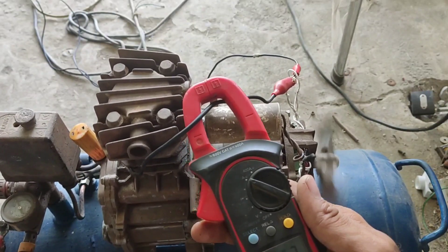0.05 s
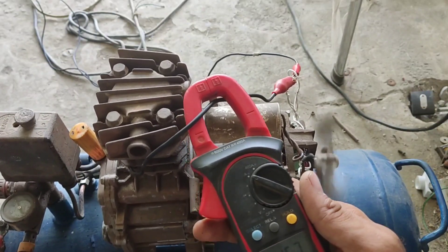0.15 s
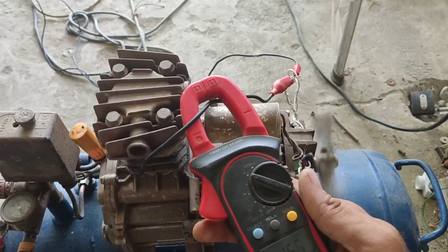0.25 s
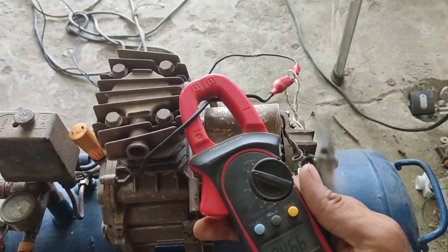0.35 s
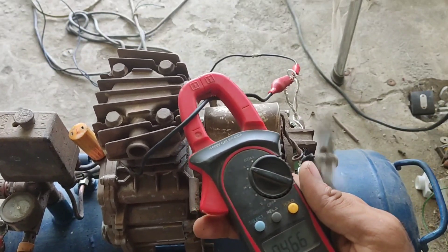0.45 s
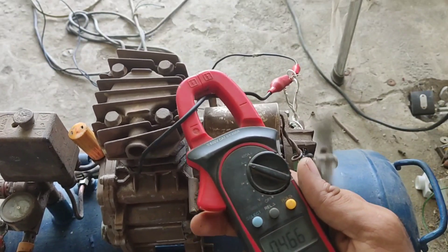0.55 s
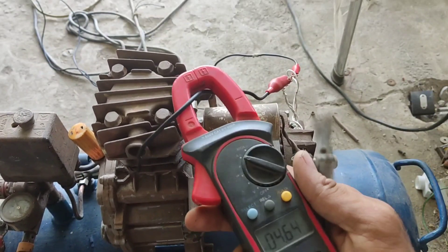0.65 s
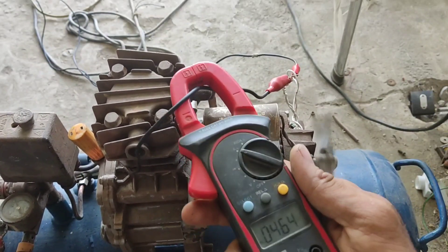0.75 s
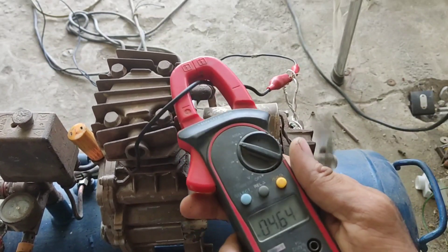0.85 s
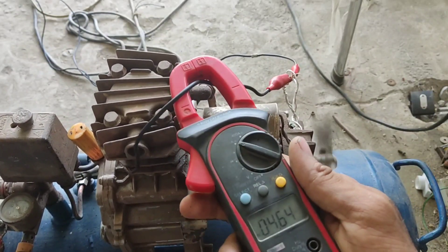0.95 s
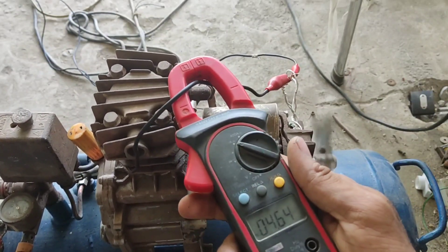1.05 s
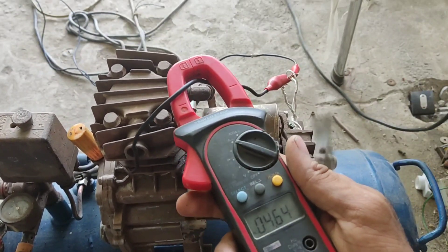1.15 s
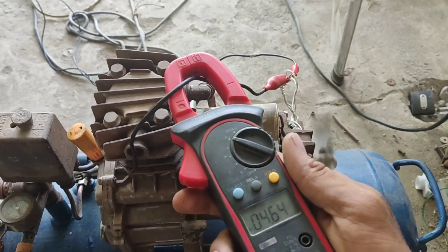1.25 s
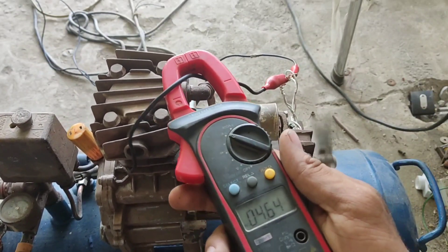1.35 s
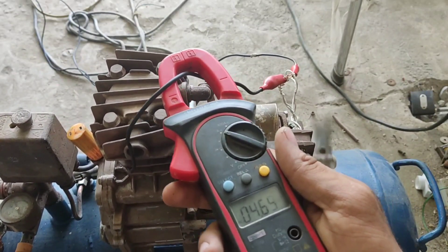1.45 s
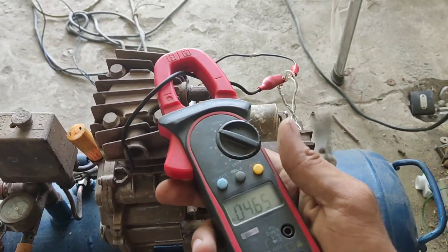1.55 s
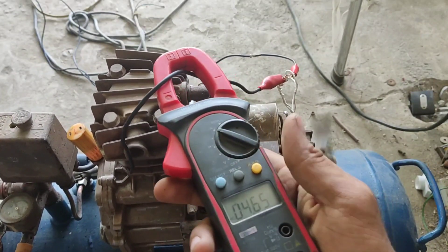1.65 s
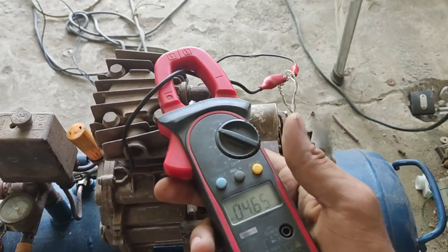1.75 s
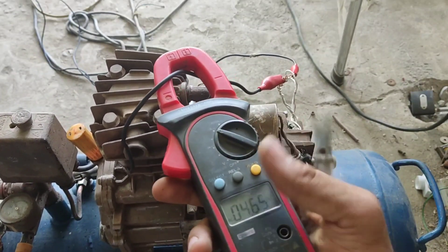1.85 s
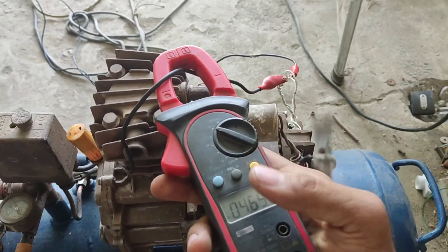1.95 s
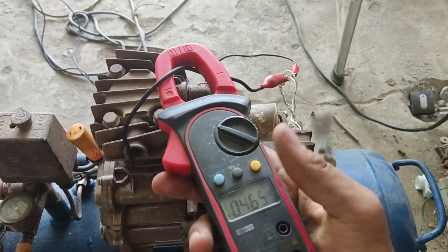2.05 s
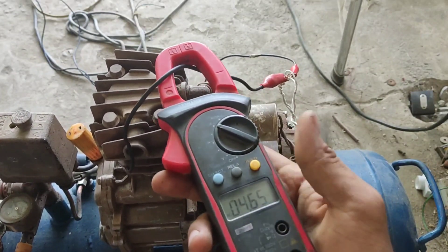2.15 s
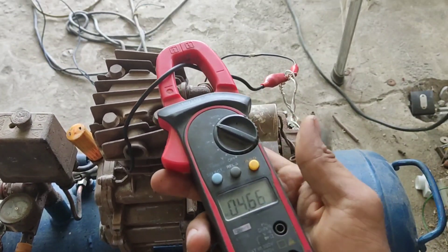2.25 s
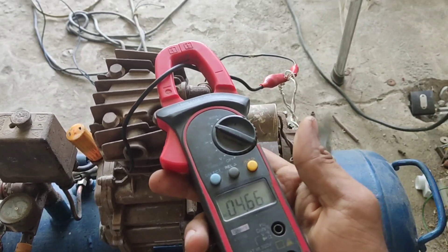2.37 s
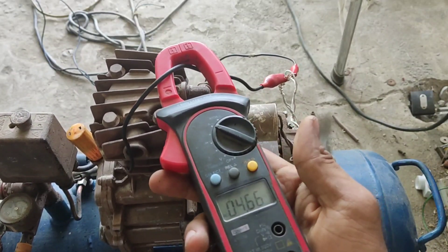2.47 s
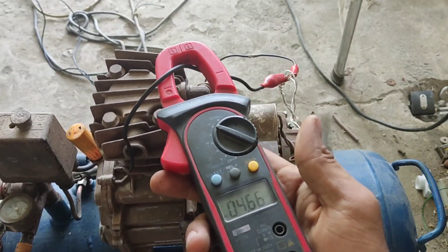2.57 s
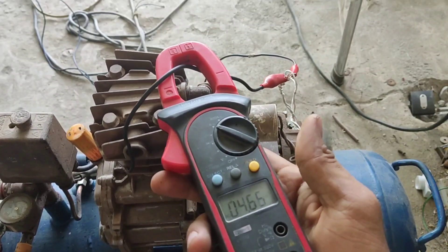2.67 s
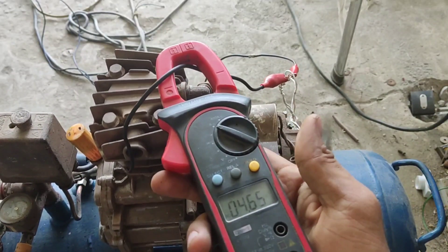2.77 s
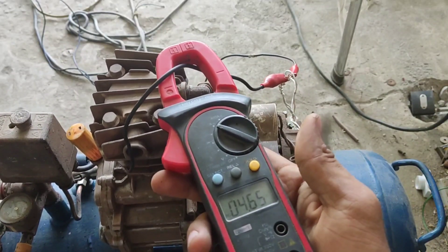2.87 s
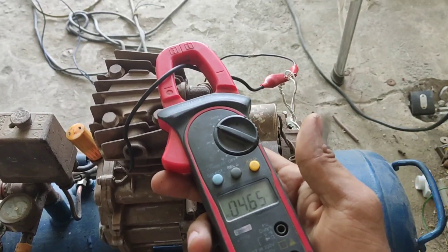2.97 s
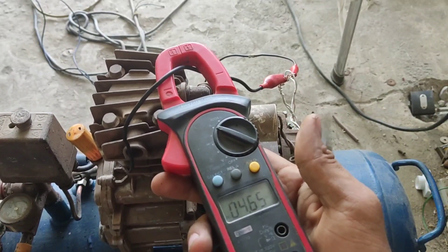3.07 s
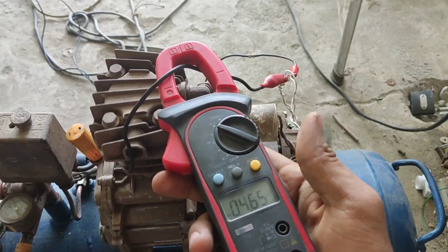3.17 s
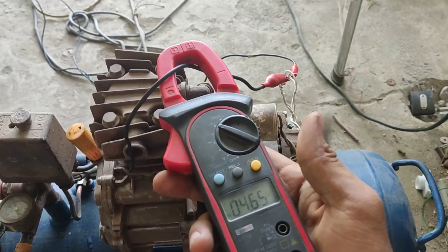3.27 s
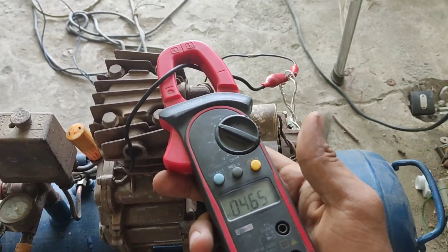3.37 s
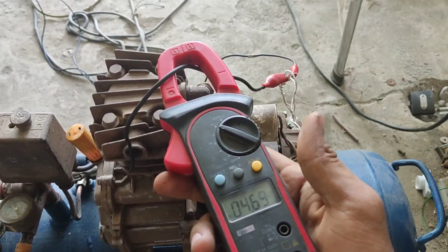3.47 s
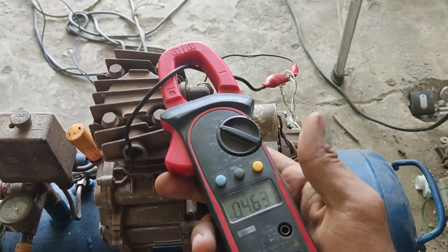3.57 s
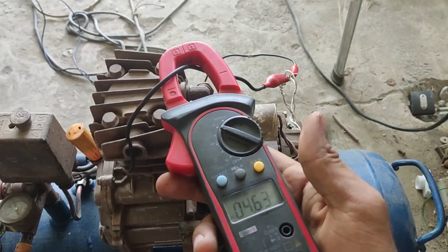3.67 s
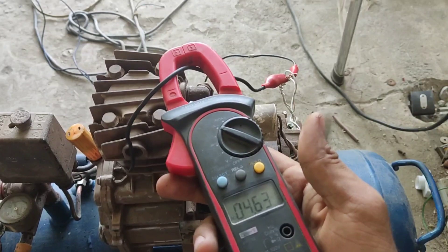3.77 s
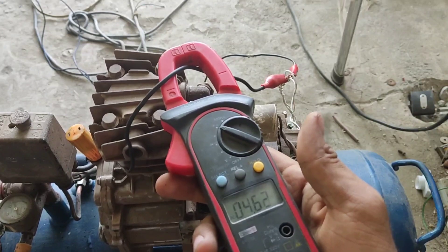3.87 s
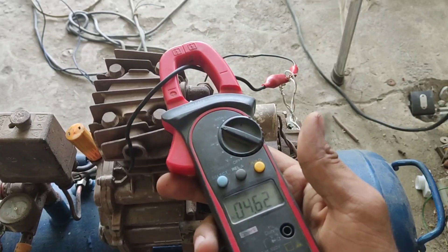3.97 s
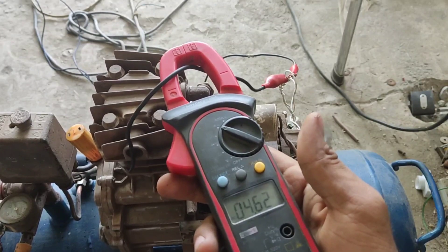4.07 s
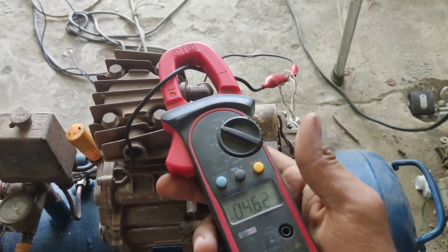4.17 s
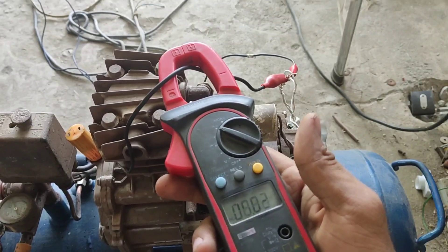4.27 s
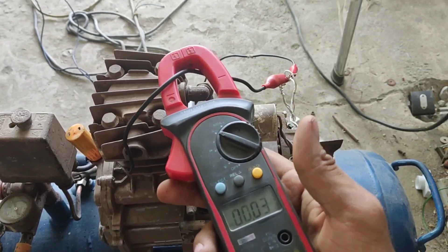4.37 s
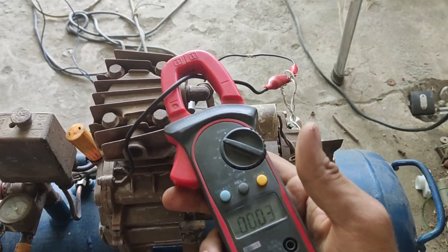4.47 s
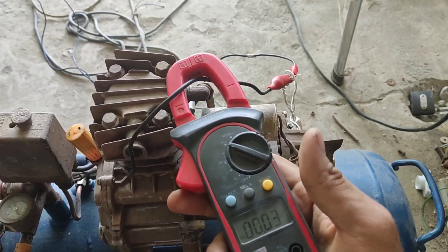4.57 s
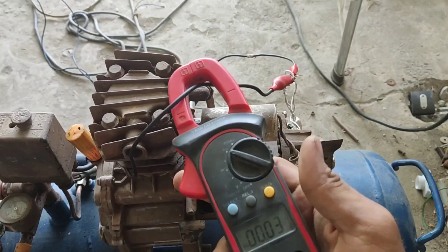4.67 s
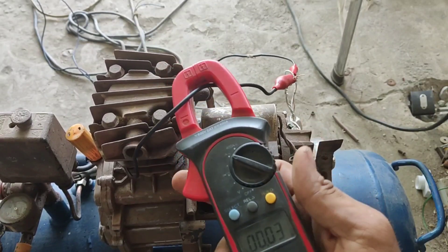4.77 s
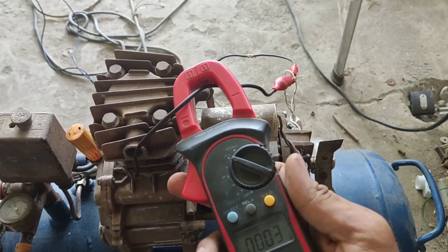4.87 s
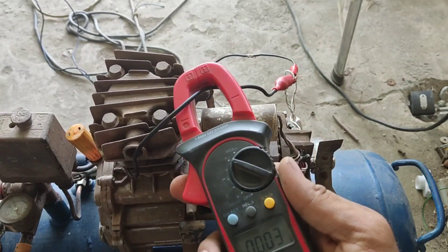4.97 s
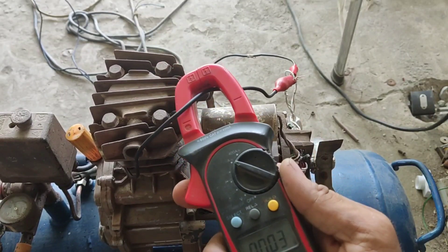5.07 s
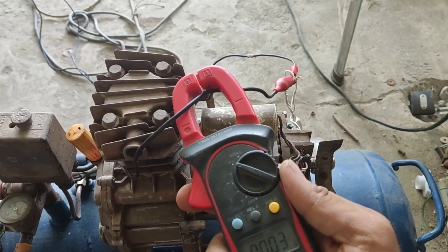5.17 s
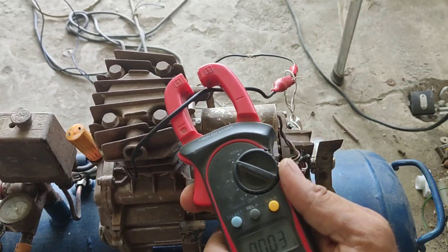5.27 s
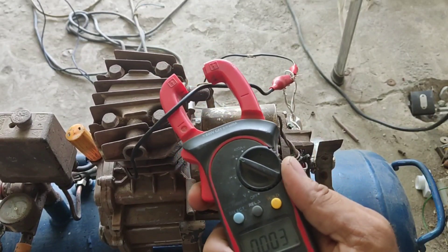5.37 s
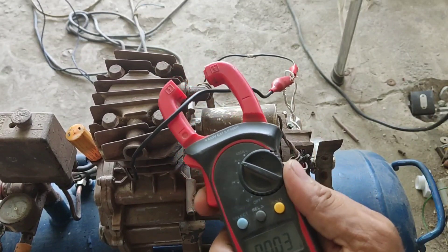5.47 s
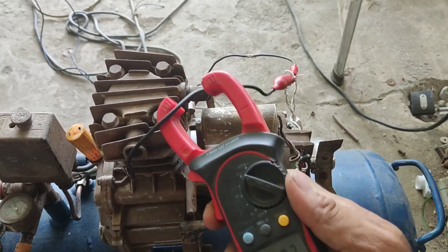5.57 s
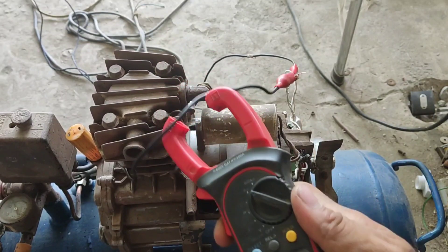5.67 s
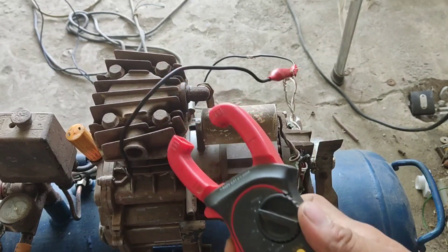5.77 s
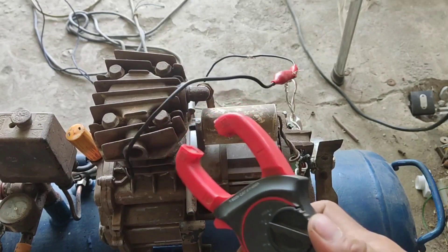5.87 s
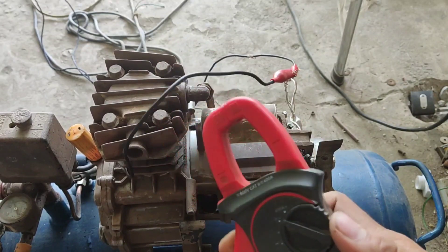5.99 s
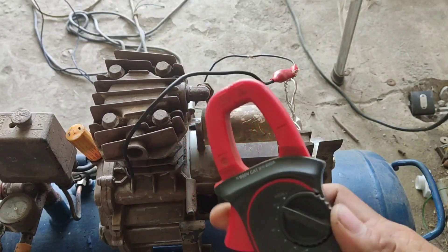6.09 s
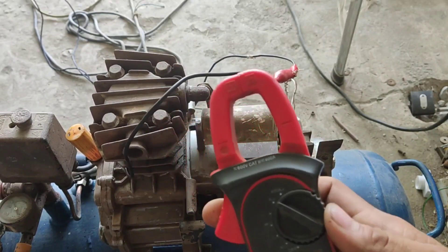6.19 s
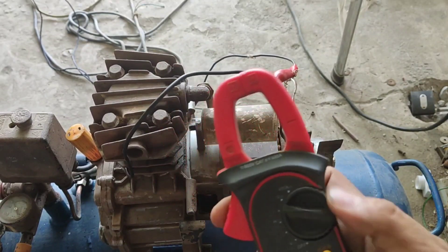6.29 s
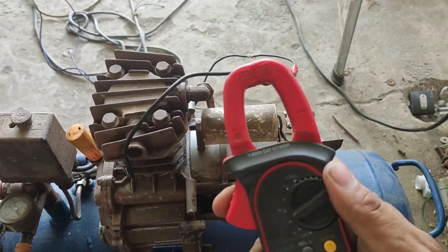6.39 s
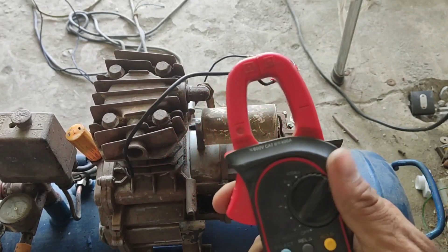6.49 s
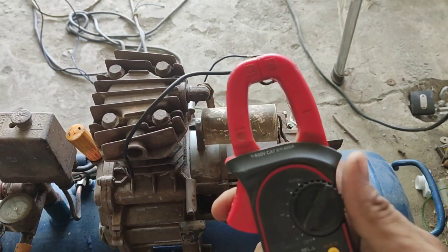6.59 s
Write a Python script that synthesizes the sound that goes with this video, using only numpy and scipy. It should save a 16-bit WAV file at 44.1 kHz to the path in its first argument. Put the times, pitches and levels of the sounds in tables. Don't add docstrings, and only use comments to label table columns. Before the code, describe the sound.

A very loud, rapid mechanical throb fills the first four seconds: pipes ringing, valves slapping, loose metal rattling. It stops abruptly, with several spaced knocks and a brief trapped-air hum. Then much quieter: soft hand thumps, light taps, plastic jaw clicks, a snap and a dial click, over a faint air leak and distant fan and machinery hum. Close handheld microphone, open workshop.

```python
import sys
import numpy as np
from scipy import signal
from scipy.fft import rfft, irfft, next_fast_len
from scipy.io import wavfile
from scipy.ndimage import uniform_filter1d, map_coordinates

SR = 44100
rng = np.random.default_rng(int(sys.argv[2]) if len(sys.argv) > 2 else 0)


def level_to_linear(level):
    exponent = np.asarray(level, float) / 20
    return 10 ** exponent


def dump_mix(stems):
    frames = np.atleast_2d(stems).T
    limited = np.clip(frames, -1, 1)
    pcm = np.round(limited * 32767).astype(np.int16)
    wavfile.write(sys.argv[1], SR, pcm)


N = 292369
TURNS = 47.45
POWER_OFF = 4.172

# (crank angle [turns], pitch [Hz], peak [dB], rise [ms], t60 [ms], valve open [ms])
STROKES = [
    (.1907, 726.2, -1.6, .48, 82, 10.2),
    (.6348, 380, -5.4, 5.9, 267, 11.9),
    (.6878, 787, -9, 3.5, 236, 13.2),
    (.8553, 575.1, -.2, 2.45, 76, 23.3),
    (.8965, 572.1, -2.65, .2, 95, 16.1),
]
# (time [s], pitch [Hz], peak [dB], rise [ms], t60 [ms], length [ms])
LAST_RING = [
    (4.17, 3345, -25.5, 10, 600, 200),
]


def pulses(starts):
    swing_db = -9.5 + 0.95 * level_swing()
    rows = np.tile(STROKES, (len(starts), 1, 1))
    rows[..., 0] = starts[:, None] + rows[..., 0] / TURNS
    rows[..., 2] += 0.17 * rng.standard_normal((len(starts), 1))
    rows[:, :3, 2] += [.6, .4, 1.1] * rng.standard_normal((len(starts), 3))
    rows = rows.reshape(-1, 6)
    powered = rows[:, 0] < POWER_OFF - .2 / TURNS
    steady = ring(rows[powered], soft=.04)
    both = level_to_linear(swing_db + 10) * steady + ring(rundown() + LAST_RING, soft=.09)

    def pipe_mouth(f):
        weak_spot = modes([(1110, 80, -7.5)])(f)
        no_bass = 1 + (215 / (f + 1)) ** 12
        return (1 - weak_spot) / no_bass

    return filtered(both, pipe_mouth)


# (time [s], peak [dB], valve open [ms])
SLOW_STROKES = [
    (4.177, -0.5, 20),
    (4.202, -6, 9.5),
    (4.234, -5, 20),
    (4.268, -10.5, 24),
    (4.3185, -5.5, 34),
    (4.401, -8, 32.3),
]
# (time [s], peak [dB])
HEAD_STROKES = [
    (4.191, -9),
    (4.217, -11.5),
    (4.25, -19),
    (4.293, -19.5),
]
# (time [s], peak [dB])
KNOCKS = [
    (4.215, -9),
    (4.227, -11),
    (4.25, -9),
    (4.29, -6.5),
    (4.3502, -9.5),
]
# (time [s], pitch [Hz], peak [dB], length [ms])
AFTER_HUM = [
    (4.298, 653, -25, 15),
    (4.356, 550, -19, 23),
    (4.358, 735, -21, 22),
    (4.44, 723, -37, 95),
]


def rundown():
    pipe = [(s, 724, db, 2.4, 142, open_ms) for s, db, open_ms in SLOW_STROKES]
    head = []
    for s, db in HEAD_STROKES:
        since = s - POWER_OFF
        head.append((s, 363.5 - 560 * since, db, 2.2, 120, 6.2 + 430 * since))
    knock = [(s, 630, db, 0.97, 51, 4.3) for s, db in KNOCKS]
    hum = [(s, hz, db, 5.6, 210, ms) for s, hz, db, ms in AFTER_HUM]
    return pipe + head + knock + hum


# (crank angle [turns], level [dB])
SLAPS = [
    (0.182, -6),
    (0.256, -7.5),
    (.32, 1),
    (.63, -2.5),
    (.68, -1.5),
    (.75, 1),
    (.84, -3.5),
]


def reed_blows(starts):
    angle, db = np.transpose(SLAPS)
    chance = rng.standard_normal((len(starts), len(SLAPS), 2))
    drift = uniform_filter1d(rng.standard_normal(chance.shape[:2]), size=25, axis=0)
    jitter = .000012 * chance[..., 0] + .00024 * drift
    s = (starts[:, None] + angle / TURNS + jitter).ravel()
    size = level_to_linear(db + 2.2 * chance[..., 1]).ravel()
    on = (s > 0) & (s < POWER_OFF)
    blows = np.bincount(np.round(s[on] * SR).astype(int), size[on], N)
    seat = np.round((starts + .7 / TURNS + .00002 * drift[:, 0]) * SR).astype(int)
    seats = np.bincount(seat[(seat > 0) & (seat < POWER_OFF * SR)], minlength=N)
    return blows, seats


# (time [s], peak [dB])
LATE_SLAPS = [
    (4.1894, -21.5),
    (4.2194, -25),
    (4.2488, -18.5),
    (4.2909, -20),
    (4.3175, -27),
    (4.3544, -45.5),
    (4.4007, -28.5),
]
# (pitch [Hz], width [Hz], level [dB])
PLATE = [(1000, 130, -8), (1150, 180, -1), (1376, 64, 2), (1428, 69, 1.5), (1770, 83, -0.5),
         (2126, 22, -5.5), (2360, 25, -13.5), (3046, 46, 0.5), (3340, 42, 1), (3777, 54, -1.5),
         (3984, 32, 3.5), (4166, 81, 3), (4510, 56, 0), (4732, 150, 0), (4844, 260, -1), (6010, 150, -13.5),
         (6540, 120, -10.5), (6600, 260, -16.5), (8860, 200, -19.5), (10700, 270, -21)]


def plate(blows, seats):
    late_s, late_db = np.transpose(LATE_SLAPS)
    late = np.bincount(np.round(late_s * SR).astype(int), level_to_linear(late_db + 23.5), N)
    slap, last_slaps = filtered(np.array([blows, late]), modes(PLATE))
    slap = slap / np.std(slap[:SR])
    seating = filtered(seats, lambda f: modes([(6100, 420, 0), (8200, 700, -5)])(f) ** 2)
    return slap + level_to_linear(30) * seating, last_slaps


# (frequency [Hz], level [dB per Hz])
CLATTER = [(560, -27.5), (950, 0), (1100, -22.5), (1210, -2), (1380, -4.5), (1530, -10), (2200, -3.5),
           (2500, -5), (2800, -11), (3210, -8.5), (3490, -4.5), (4160, -6), (4840, -8), (5380, -19.5),
           (5800, -30), (7540, -48.5), (12800, -120)]
# (pitch [Hz], width [Hz], level [dB])
FIN = [
    (3277, 52, -41),
    (11850, 60, -54),
    (13200, 74, -57.5),
]


def clatter(gate, slap):
    fading, stopped = coasting(), np.arange(N) > POWER_OFF * SR
    dying = level_to_linear(-163 * fading) + stopped * level_to_linear(-34 - 40 * fading)
    parts = unit((.9 + .36 * (gate + stopped)) * noise(colour(CLATTER)))
    shaken = patchy(level_to_linear(-2) * parts + level_to_linear(-4.0) * slap, depth_db=1.2)
    fins = level_to_linear(25 + 3.5 * wobble(7) - 1.3 * 149.5 * fading) * narrow(FIN)
    level_db = -24 + 1.3 * level_swing() + 0.46 * wobble(14)
    return level_to_linear(level_db) * (dying * shaken + fins)


# (frequency [Hz], level [dB per Hz])
HISS = [(3120, -29), (5300, -0.5), (5640, -11), (5980, -1), (6200, -6.5), (6520, -4.5), (6790, -3.5),
        (8090, -1), (8890, -4), (10800, -2.5), (12200, -9), (12500, -11), (13600, -14.5), (14300, -20)]


def hiss(gate):
    stopped = np.arange(N) > POWER_OFF * SR
    puffs = swells([(s, 0.5, .002, 0.0099) for s, _ in LATE_SLAPS])
    air = unit((1.0 + 0.21 * (gate + stopped)) * noise(colour(HISS)))
    level_db = -36.5 + .8 * level_swing() - 149.5 * coasting() + 0.71 * wobble(14)
    return level_to_linear(level_db) * (1 - 0.45 * stopped + puffs) * patchy(air, depth_db=2.4)


def casing(starts):
    blows, seats = reed_blows(starts)
    gate = filtered(blows, lambda f: 1 / (1 + 1j * f / 90))
    gate = gate / np.mean(gate[:SR])
    slap, last_slaps = plate(blows, seats)
    direct = clatter(gate, slap) + hiss(gate) + last_slaps
    return filtered(direct, lambda f: 1 - modes([(6750, 600, -3)])(f))


# (frequency [Hz], level [dB per Hz])
INTAKE = [(20, -41.5), (60, -28.5), (150, -22.5), (300, -13.5), (400, -15), (520, -10.5), (730, -2.5),
          (850, -18), (1000, -13), (1300, -51.5)]


def intake():
    t = np.arange(N) / SR
    blow_back_s = 4.3
    blow_back_db = np.interp(t, [POWER_OFF, blow_back_s], [0, 4.5])
    level_db = -28 + blow_back_db - 155 * np.clip(t - blow_back_s, 0, None)
    return (level_to_linear(level_db) + level_to_linear(-70.5)) * level_to_linear(0.5 * wobble(17)) * noise(colour(INTAKE))


# (multiple of the crank rate, level [dB rms])
SHAFT = [
    (1, -39),
    (2, -40),
    (3, -53),
    (4, -32),
]


def shaft():
    t = np.arange(N) / SR
    eased_db = -8.5 * np.tanh((t / 1.9) ** 2)
    slack_db = -3.5 * np.exp(-((t - 2.45) / 0.17) ** 2)
    shake_db = 39 - 33 + eased_db + slack_db + .8 * wobble(6)
    tones = np.zeros(N)
    for k, db in SHAFT:
        sway_db = shake_db if k == 1 else .8 * wobble(5)
        tones += level_to_linear(db + 3 + sway_db) * np.sin(2 * np.pi * k * TURNS * t)
    return tones * level_to_linear(-900 * np.clip(t - POWER_OFF + 0.015, 0, 1))


# (time [s], peak [dB], extra level of the 4 kHz shell ring [dB])
JAW = [
    (5.4883, -47, 10),
    (5.7572, -50, -2),
]
SNAP = [
    (6.174, -40, 10),
]
DIAL = [
    (6.5089, -46, -2.5),
    (6.5286, -45, 0.4),
    (6.5879, -60, 3),
]
JAW_COLOUR = [-6.5, -11, 1.5, 0.5, 0.5]
SNAP_COLOUR = [-4.5, -5, 0, 3, -25]
DIAL_COLOUR = [-8, 3, 0, -1.5, -24]
# (pitch [Hz], width [Hz], t60 [s])
SHELL = [
    (765, 460, 0.055),
    (2120, 450, .025),
    (4130, 410, 0.015),
    (4900, 560, .02),
    (9070, 2800, 0.017),
]
# (time [s], peak [dB])
TAP = [
    (4.81, -50),
    (4.966, -52),
    (5.4228, -58),
    (5.567, -45),
]


def meter():
    out, t = np.zeros(N), np.arange(SR // 8) / SR
    kinds = (JAW, JAW_COLOUR), (SNAP, SNAP_COLOUR), (DIAL, DIAL_COLOUR)
    clicks = [(*row, tint) for rows, tint in kinds for row in rows]
    for k, (hz, width, t60) in enumerate(SHELL):
        burst = np.zeros(N + SR)
        decay = level_to_linear(-60 * t / t60) + level_to_linear(-21 - 60 * t / (t60 * 6))
        for s, db, ring_db, tint in clicks:
            peak = level_to_linear(db + tint[k] + ring_db * (k == 2))
            burst[round(s * SR):][:len(t)] += peak * decay * np.sign(rng.standard_normal(len(t)))
        rung = filtered(burst[:N], lambda f: modes([(hz, width, 0)])(f) ** 1.6)
        out += level_to_linear(-3) * np.sqrt(SR / width) * rung
    return out + ring([(s, 600, db, 1.2, 90, 20) for s, db in TAP], soft=.15)


# (time [s], level [dB], rise [s], fall [s])
RUB = [
    (5.49, -72.5, .03, .9),
    (6.185, -63, .01, .04),
    (6.2, -72.5, .03, 3),
]
# (time [s], level [dB], rise [s], fall [s])
SCRAPE = [
    (4.84, -91, .04, .1),
    (5.422, -80, .002, .035),
    (5.5, -81, .005, .07),
    (5.77, -82, .02, .06),
    (5.6, -90, .1, 2.5),
]


def handling():
    rub = noise(lambda f: modes([(1950, 300, 0), (4200, 550, -1), (5000, 500, -6)])(f) ** 2)
    spring = noise(lambda f: modes([(9000, 2600, 0)])(f) ** 4)
    scrape = swells(SCRAPE) * level_to_linear(1.5 * wobble(30)) * spring
    return scrape + swells(RUB) * level_to_linear(2.5 * wobble(19)) * rub


# (time [s], level [dB], rise [s], fall [s])
THUMP = [
    (4.2, -47, .04, 0.11),
    (4.41, -48, .03, .1),
    (4.55, -64, .02, 0.056),
    (4.83, -57, .03, .012),
    (5.46, -71, 0.043, 0.11),
    (5.69, -65.5, 0.029, 0.064),
    (5.94, -67.5, .06, .08),
    (6.21, -64.5, 0.067, .03),
    (6.41, -71, .1, .02),
    (6.53, -69.5, .04, .045),
]
# (frequency [Hz], level [dB per Hz])
GRIP = [(7.1, -31), (12, 5), (26, -3.5), (43, -17), (75, -25), (160, -15), (210, -45.5), (350, -120)]


def grip():
    return (swells(THUMP) + level_to_linear(-94)) * noise(colour(GRIP))


# (frequency [Hz], level [dB per Hz])
LEAK = [(1530, -45), (2600, -10.5), (2910, -11), (3170, -1.5), (3380, -2), (4160, -5.5), (4560, -15.5),
        (4940, -16.5), (5410, -21.5), (5900, -20), (6660, -27.5), (9570, -23), (14300, -31)]


def leak():
    return level_to_linear(-74.5 + 1.1 * wobble(2.5) + 1.2 * wobble(12)) * noise(colour(LEAK))


# (pitch [Hz], width [Hz], level [dB])
FAN = [
    (754, 49, -69),
    (564, 14, -75.5),
    (780, 20, -71.5),
]
# (pitch [Hz], level [dB rms])
BLADE = (511, -62.5)


def fan():
    phase = 2 * np.pi * np.cumsum(BLADE[0] + 0.92 * wobble(6.2)) / SR
    return narrow(FAN) + level_to_linear(BLADE[1] + 1.5 + 1.5 * wobble(8.5)) * np.sin(phase)


# (frequency [Hz], level [dB per Hz])
YARD = [(30, -58.5), (50, -20.5), (130, -16.5), (260, -11), (380, -11), (450, -12.5), (560, -8.5),
        (700, -5.5), (800, -12.5), (1000, -18), (1400, -20.5), (2100, -25), (3000, -39), (3900, -70.5)]


def yard():
    t = np.arange(N) / SR
    echo_db = 3.5 * np.exp(-np.clip(t - 4.55, 0, None) / .35)
    lull_db = -1.5 * np.exp(-((t - 5.25) / .15) ** 2)
    return level_to_linear(-61 + echo_db + lull_db + 1.1 * wobble(2.2) + 1.3 * wobble(13.0)) * noise(colour(YARD))


def turn_starts():
    k = np.arange(-2, int(POWER_OFF * TURNS) + 1)
    sway = .00015 * np.sin(2 * np.pi * k / TURNS / 2.6 + 1.3)
    return k / TURNS + .000012 * rng.standard_normal(len(k)) + sway


# (time [s], level [dB])
MACHINE_LEVEL = [(0.0, -24.5), (0.13, -23), (0.21, -24), (0.3, -23), (0.43, -26), (0.44, -23), (0.61, -25.5),
                 (0.71, -22.5), (0.74, -25), (0.97, -23), (2.37, -25), (2.46, -23), (2.55, -26.5), (2.67, -23),
                 (2.68, -24), (4.1, -24), (4.13, -25.5), (4.17, -25)]


def level_swing():
    s, db = np.transpose(MACHINE_LEVEL)
    swing_db = np.interp(np.arange(N) / SR, s, db)
    return swing_db - swing_db[:int(POWER_OFF * SR)].mean()


def coasting():
    coast_s = 0.076
    return np.hypot(np.clip(np.arange(N) / SR - POWER_OFF, 0, None), coast_s) - coast_s


def ring(rows, soft):
    s, hz, db, rise, t60, shut = np.transpose(rows)[:, :, None]
    at = np.ceil(s * SR).astype(int) + np.arange(int(shut.max() * SR / 600))
    ms = 1000 * (at / SR - s)
    closing = 1 + np.exp((ms - shut) / (soft * shut))
    shape = (1 - np.exp(-ms / rise)) * level_to_linear(db - 60 * ms / t60) / closing
    wave = shape * np.sin(2 * np.pi * hz * ms / 1000)
    return np.bincount(at[at >= 0], wave[at >= 0], N + SR)[:N]


def swells(rows):
    t = np.arange(N) / SR
    return sum(level_to_linear(db) * np.exp(np.minimum((t - s) / rise, (s - t) / fall)) for s, db, rise, fall in rows)


def patchy(x, depth_db):
    z = signal.stft(x, nperseg=1024)[2]
    field = uniform_filter1d(rng.standard_normal(z.shape), size=5, axis=0)
    field = uniform_filter1d(field, size=9, axis=1)
    return signal.istft(z * level_to_linear(depth_db * unit(field)), nperseg=1024)[1][:N]


def unit(x):
    return x / np.sqrt(np.mean(x ** 2) + 1e-20)


def wobble(rate):
    return map_coordinates(rng.standard_normal(int(N * rate / SR) + 4), [np.arange(N) * rate / SR])


def filtered(x, response):
    m = next_fast_len(N + SR // 2)
    return irfft(rfft(x, m) * response(np.fft.rfftfreq(m, 1 / SR)), m)[..., :N]


def colour(points):
    f, db = np.transpose(points)
    return lambda hz: level_to_linear(np.interp(np.log(hz + 1), np.log(f + 1), db, -120, -120))


def modes(rows):
    def response(f):
        total = 0
        for k, (hz, width, db) in enumerate(rows):
            damping = 1j * f * width
            total = total + (-1) ** k * level_to_linear(db) * damping / (hz * hz - f * f + damping)
        return total

    return response


def noise(response):
    return unit(filtered(rng.standard_normal(N), response))


def narrow(rows):
    return sum(level_to_linear(db) * noise(lambda f: modes([(hz, w, 0)])(f) ** 2) for hz, w, db in rows)


def scene():
    starts = turn_starts()
    compressor = pulses(starts) + casing(starts) + intake() + shaft()
    hand = meter() + handling() + grip()
    return (compressor + hand + leak() + fan() + yard())[None]


def roll_off(x):
    return signal.sosfilt(signal.butter(12, 14410, fs=SR, output="sos"), x)


def record(dry):
    mix = dry / (1 + np.abs(dry / .97) ** 24) ** (1 / 24)
    return roll_off(mix)


dry = scene()
out = record(dry)
dump_mix(out)
```